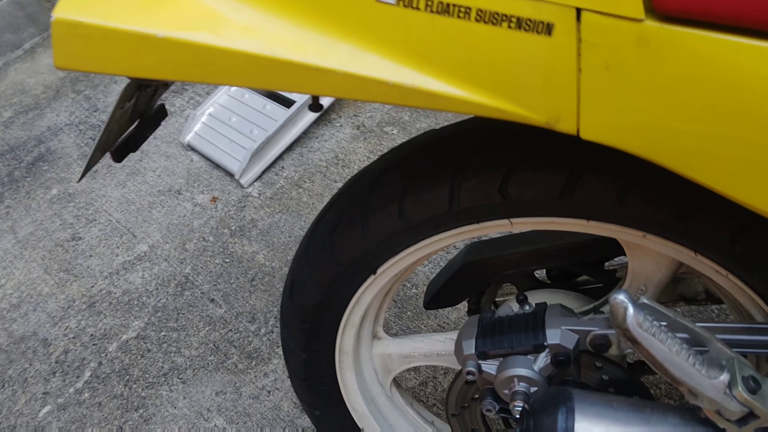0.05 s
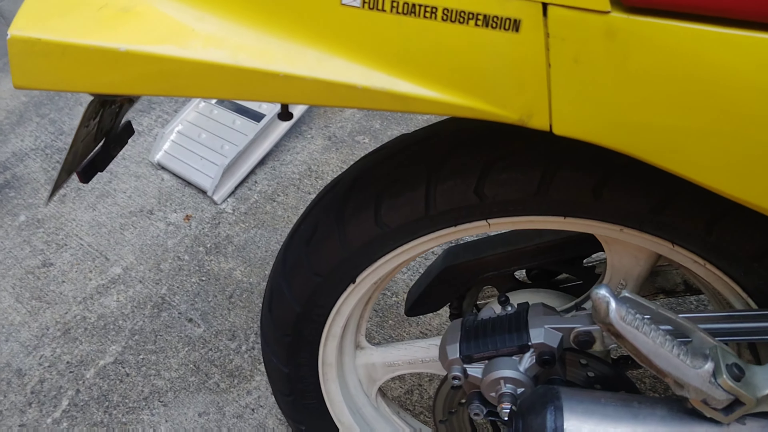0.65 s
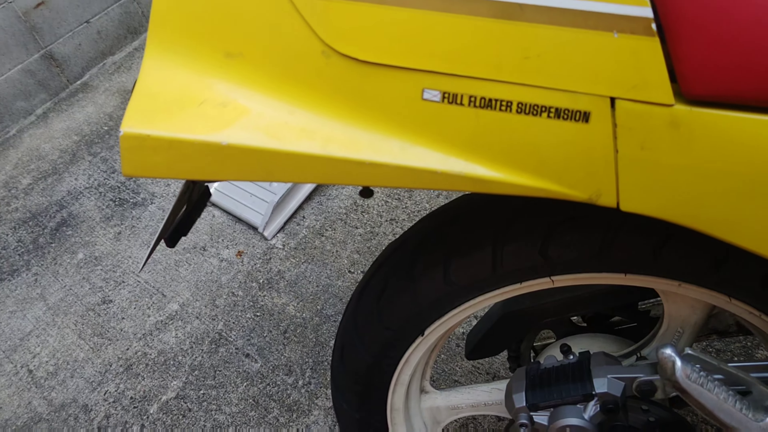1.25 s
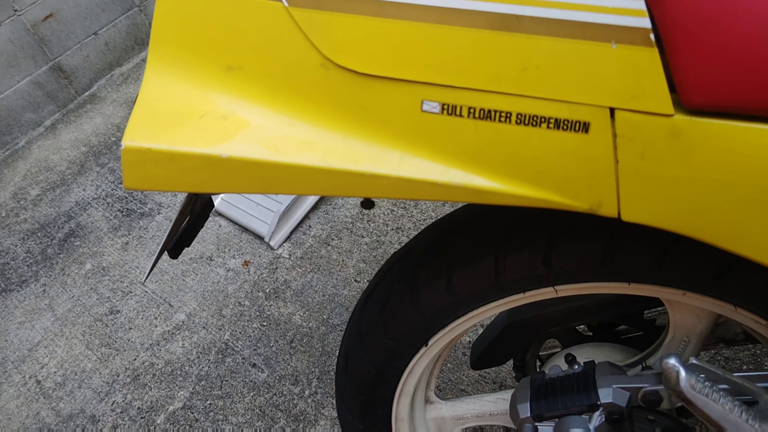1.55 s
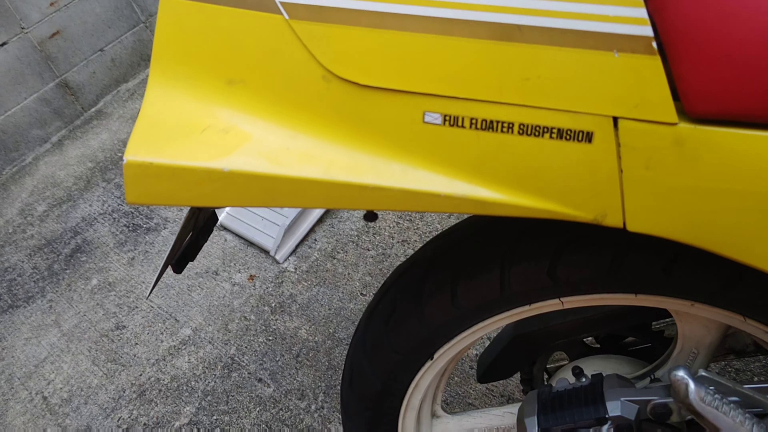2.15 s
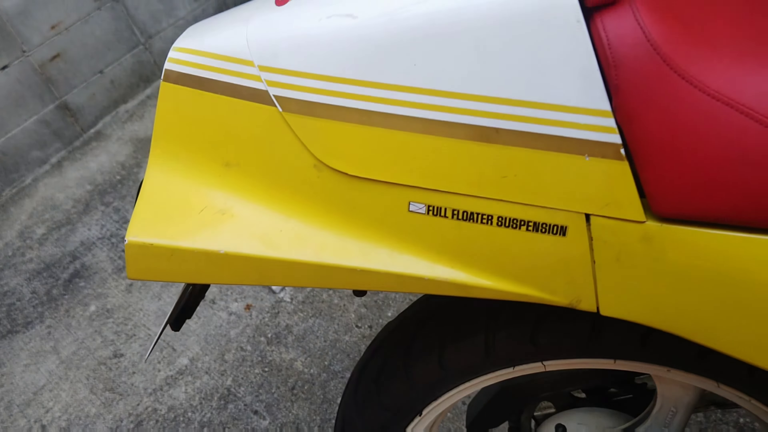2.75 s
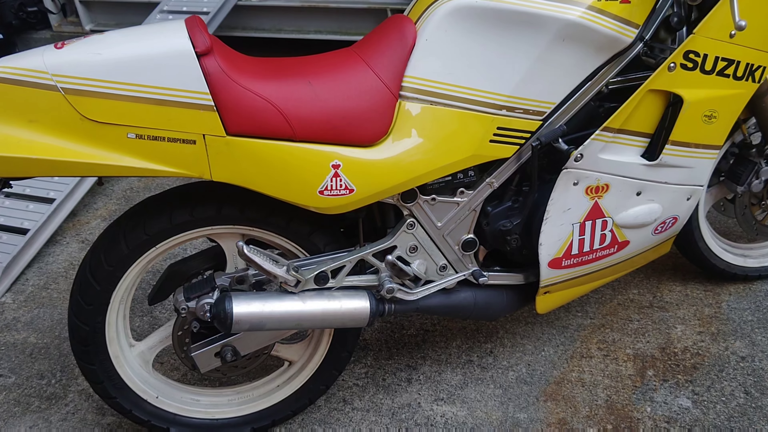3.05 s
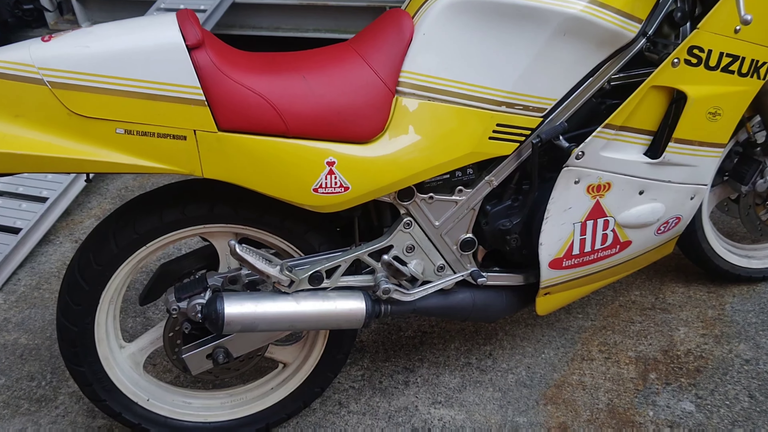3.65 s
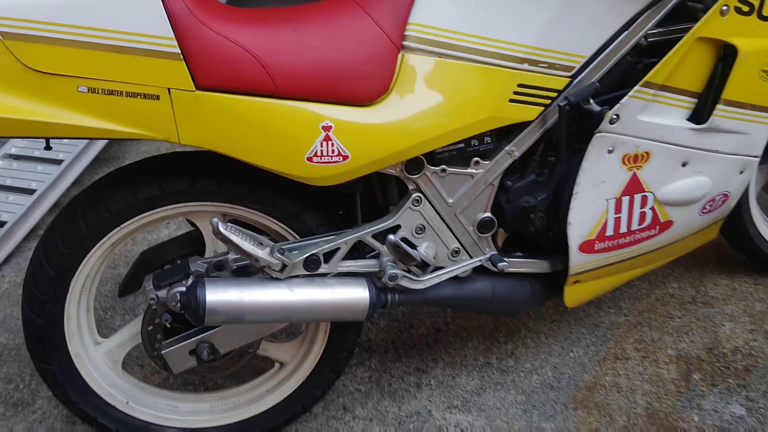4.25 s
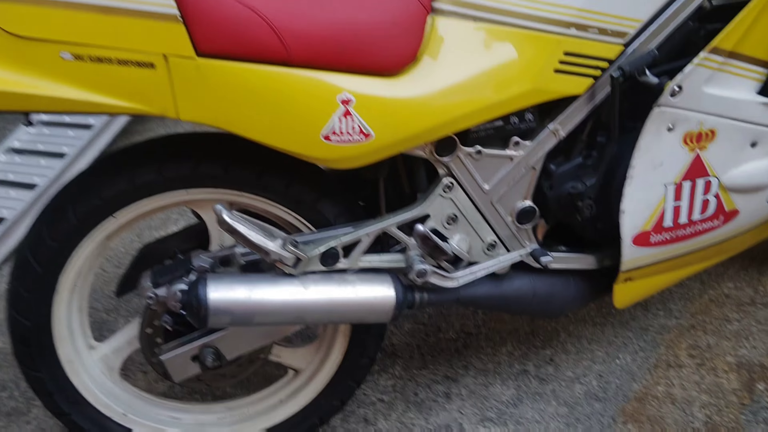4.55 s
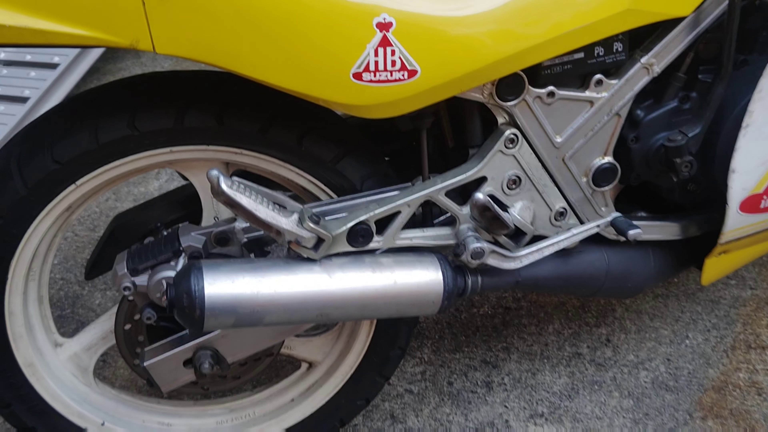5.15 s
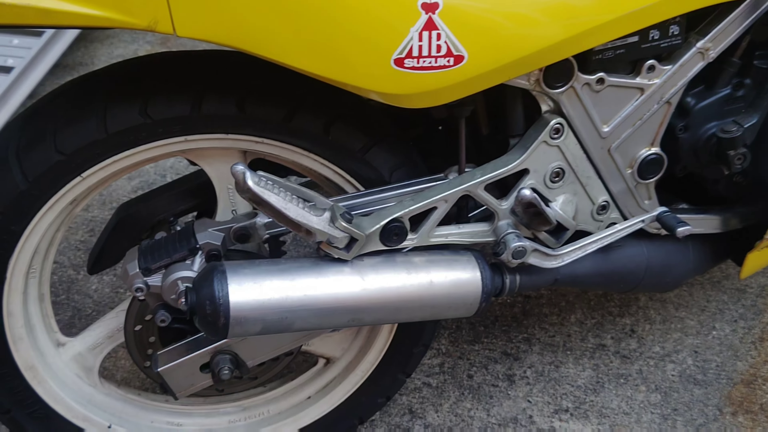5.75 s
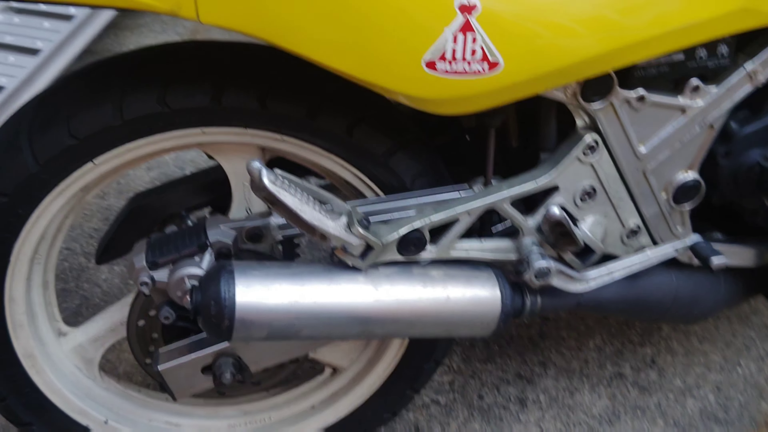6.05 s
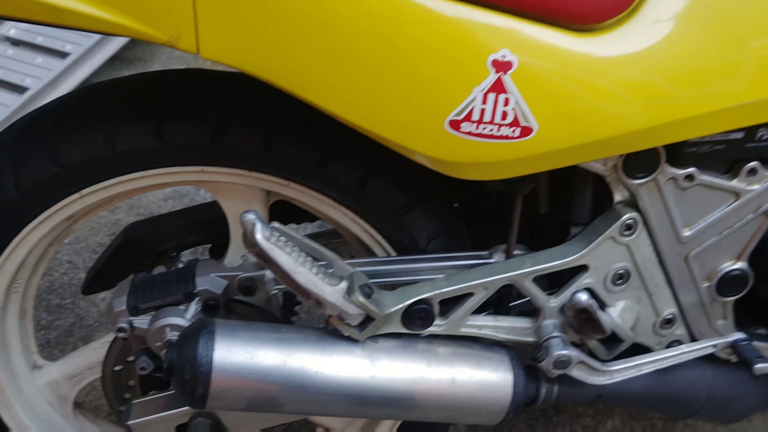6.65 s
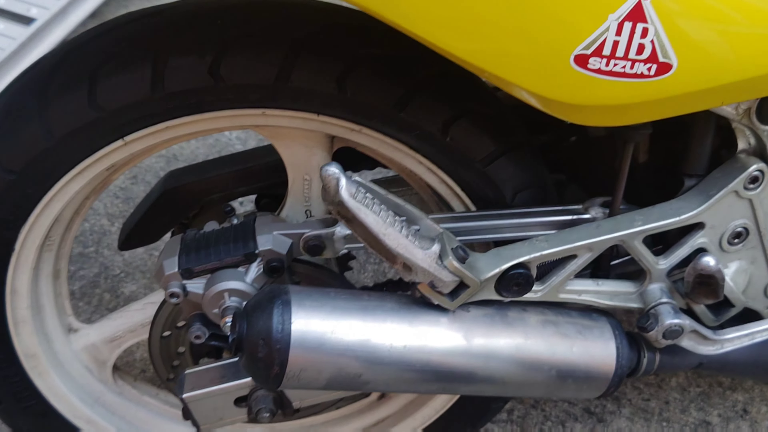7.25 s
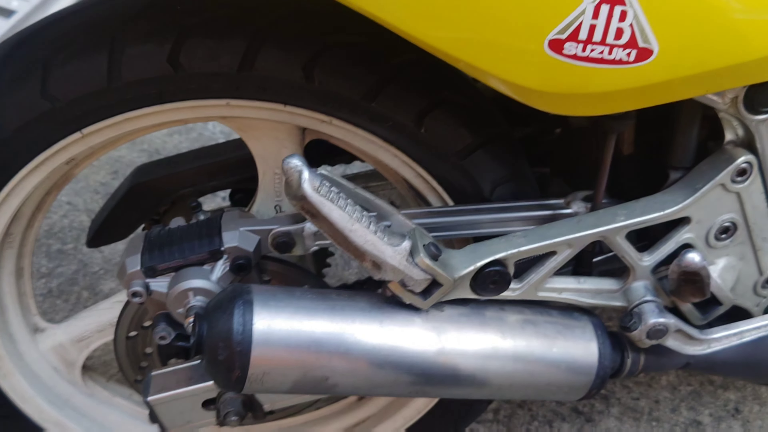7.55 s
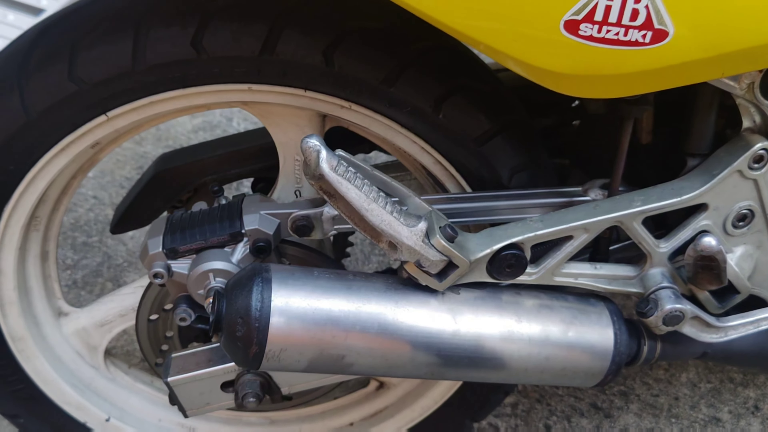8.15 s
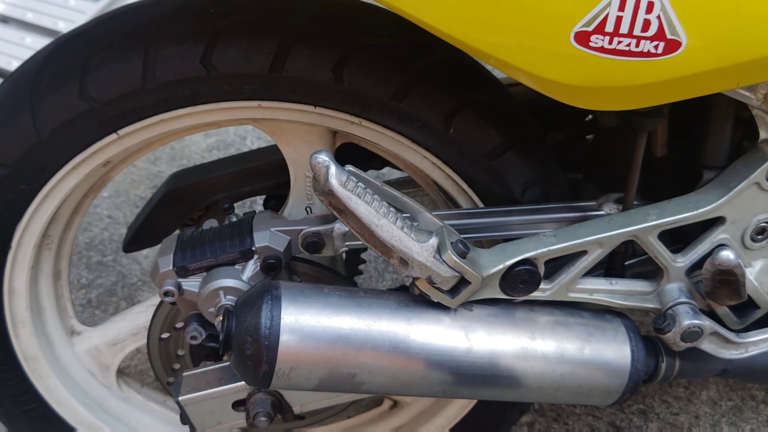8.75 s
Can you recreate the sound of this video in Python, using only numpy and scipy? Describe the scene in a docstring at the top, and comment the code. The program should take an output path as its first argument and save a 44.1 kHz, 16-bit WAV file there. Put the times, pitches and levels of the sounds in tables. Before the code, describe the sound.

A small two-stroke motorcycle winds down from high revs and stops with metal clacks, then idles unevenly with loud exhaust pops.

```python
"""A small two-stroke motorcycle stands on concrete, heard a step from its silencer.
First the revs fall from a blip of the throttle and catch briefly. The engine then runs down and stops
with a few metal clacks. After a short silence it idles unevenly, with loud pops among mild turns.
Each firing rings the exhaust chamber (a boom) and the tailpipe (a bark) and spits gas,
while the cylinder rattles. Three sharp clicks are heard, and toward the end the idle grows lumpier."""
import sys
import numpy as np
from scipy import signal
from scipy.fft import rfft, irfft
from scipy.io import wavfile
from scipy.ndimage import uniform_filter1d, minimum_filter1d, map_coordinates

SR = 44100
rng = np.random.default_rng(int(sys.argv[2]) if len(sys.argv) > 2 else 0)


def output_pcm(signal):
    """Save a mono or channel-first signal as 16-bit PCM at the path in sys.argv[1].

    Samples are clipped to [-1, 1] before scaling.
    """
    pcm = np.clip(np.atleast_2d(signal).T, -1, 1) * 32767
    wavfile.write(sys.argv[1], SR, np.round(pcm).astype(np.int16))


N = 392049
T = np.arange(N) / SR

# Falling crank speed: t/s, turns/Hz
CRANK_SPEED = [(0, 110.7), (.08, 107), (.188, 100.4), (.364, 94), (.51, 89.3), (.628, 79.2), (.742, 73.7),
               (.86, 66), (.936, 57.4), (1.026, 53.5), (1.165, 45), (1.282, 47), (1.43, 47.3), (1.5, 44.7),
               (1.594, 40), (1.7, 31), (1.75, 25)]
# Exhaust while running down: t/s, boom level/dB, bark level/dB
EXHAUST_LEVELS = [(0.0, -19, -21), (0.08, -10, -18), (0.27, -14.5, -21), (0.47, -9, -17), (0.55, -8, -22),
                  (0.63, 1.5, -16), (0.73, 0.5, -28), (0.78, -2, -18), (1.2, -2.5, -18), (1.32, -3, -23.5),
                  (1.41, -3.5, -14.5), (1.54, -4, -18.5), (1.59, -0.5, -29), (1.66, 0.5, -31),
                  (1.69, -6, -36), (1.74, -7, -25), (1.79, -5, -29), (1.83, -1, -34), (1.9, -10, -37.5),
                  (1.94, -4.5, -38), (1.99, -9, -31.5), (2.07, -9, -40.5), (2.12, -17, -42),
                  (2.22, -23.5, -49), (2.4, -27, -50)]
# Boost from a slightly open throttle: t/s, rasp level/dB, hiss level/dB
THROTTLE = [(0, 11.5, 5), (.27, 1, 4), (.32, 4, -0.5), (.38, 5, 7.5), (.5, 7, 4), (.64, 1, 2.5),
            (.9, 0.5, 0), (1.05, 0, 3.5), (1.15, 1, 1.5), (1.24, 0, 6.5), (1.34, -2.5, -1.5),
            (1.46, 0.5, 4.5), (1.6, -2.5, 0.5)]
# Moments of uneven burning: t/s, half length/s, extra level spread/dB
STUMBLES = [(0.253, 0.028, 13.2), (.41, 0.095, 4)]
# A slow engine sputters: turns/Hz, level spread/dB, timing spread/s
SPUTTER = [(42, 1.3, .0001), (55, .8, .00005), (70, 0, 0)]
# A slow engine's gas churns more: turns/Hz, noise strength in the boom, in the bark
BURBLE = [(20, .7, 3), (32, .15, 1.6), (46, .08, .3), (80, .03, .12)]
# Idle pops: t/s, then level/dB of bark, boom, spit, ping, next turn's boom and spit, later mild booms
POPS = [(3.086, -27, -14, -37, -52.0, -16, -46.0, -12), (3.151, -29, -18.5, -46, -59.0, -12, -40, -8),
        (3.225, -23, -7, -32.5, -52, -10, -39, -10), (3.298, -17, -11, -34, -52, -14, -56, -17.5),
        (3.37, -29, -7.5, -37, -57.5, -11.5, -43, -9), (3.45, -20.5, -7, -32, -52, -8.5, -41, -14.0),
        (3.499, -20, -6, -32.5, -56.0, -11.5, -50, -11),
        (3.578, -24.5, -2.5, -29.5, -38, -8.5, -38.5, -14.5),
        (3.658, -17, -4.5, -26.5, -38, -5.5, -42, -1.5), (3.735, -22.0, -2, -31, -37, -7, -44, -8),
        (3.813, -19, -4, -44, -50.0, -5.5, -51, -16), (3.866, -25, -2.5, -37, -50, -2.5, -53, 1.5),
        (3.942, -28, -0.5, -29, -35, -7, -29, -4), (4.049, -23.5, -4.5, -38, -51.0, -3.5, -45, 2),
        (4.124, -18, 1, -26.5, -36, -6.5, -47, -8), (4.206, -33, -10, -46, -52.0, -13, -47, -6.5),
        (4.285, -29, -9, -35, -43, -7, -45, -6.5), (4.352, -27, -1.5, -37, -52.0, -3, -36.5, -1),
        (4.432, -21, -6, -32, -38, -7.5, -46.5, -14.0), (4.483, -20, -1, -29.5, -32, -4, -49, -4.0),
        (4.562, -21, -2, -29, -31, -10, -44, -6), (4.64, -19.0, -0.5, -29, -35, -4.0, -45, -14.0),
        (4.692, -26, -1.5, -32, -53.5, -0.5, -37, -3.5), (4.794, -25, -2.0, -31.5, -36, -6, -49, -0.5),
        (4.875, -29.0, -2.0, -28.5, -55, -0.5, -34.0, -2), (4.998, -32, 0, -34, -49, -2.5, -35, -6.5),
        (5.15, -22, 1, -32, -44.0, -1.5, -40, -3), (5.302, -18.5, 0.5, -29, -34, -6, -38, 3.5),
        (5.404, -20, 1, -30, -34, -1.5, -46.0, -8), (5.479, -30, 0.5, -31, -42.5, -17, -46, -2),
        (5.555, -15, 0.5, -29, -31, -2, -48.0, 0.5), (5.682, -18, -0.5, -25, -52, -3.0, -50, -4),
        (5.81, -17.0, 0.5, -39.5, -34, -6, -32, -20), (5.863, -16.0, 0, -33, -32, -0.5, -43.0, -14.0),
        (5.913, -14.5, 1, -30, -32, -6, -51, -2.5), (6.047, -19, -4.5, -30, -43.5, -2, -38.5, -2),
        (6.118, -15, 0.5, -32, -30, -4.5, -42, -0.5), (6.206, -17, 1, -25.5, -50.5, -1, -44, -6.5),
        (6.277, -17.5, 1, -34, -51.0, -21, -47.5, -14.0), (6.333, -16, -1, -26, -36, -2, -27.5, -10),
        (6.489, -19, 0, -28.5, -42, -5, -31, 2.5), (6.597, -27, -8.5, -35, -52.5, -4, -34.0, -6),
        (6.675, -39, -9, -45, -46.0, -1, -35, 2), (6.751, -14.5, -0.5, -31.5, -50.0, -14, -54, -1),
        (6.886, -15, -3.0, -26, -49, 1.5, -32.5, -1), (6.958, -21, -2.5, -37, -49, -7.0, -53, -14.0),
        (7.01, -22, -2.5, -29.5, -33, -1, -29.5, -17.5), (7.111, -21, -7, -39, -51, -10.5, -51, -14.0),
        (7.164, -16, 0, -28.5, -28, 1, -28.5, -15.5), (7.266, -21, -6.5, -47, -53.0, -9, -59, -14.0),
        (7.319, -12.5, -0.5, -27, -24, 1.5, -30.5, -9.5), (7.472, -11, -1, -24.5, -18, 1, -37, -6),
        (7.626, -15, 2, -33, -42.5, -10.5, -51, -14.0), (7.679, -14.0, -0.5, -25.5, -26, 0.5, -40, -5),
        (7.808, -25, -0.5, -36.0, -55.0, 1, -33, -11.5), (7.887, -12.0, 1, -28, -29.5, -10, -55, -9.0),
        (7.967, -27, -0.5, -32, -52.5, -8.5, -43.0, -14.0), (8.022, -18, 0, -31, -53.0, -8.0, -29.0, -14.0),
        (8.046, -11, 3, -28, -38, -13.5, -50, -14.0), (8.098, -16, 0, -33.5, -34.0, -15, -47.0, 1.5),
        (8.18, -14, -0.5, -23.5, -47.0, -14, -35.0, 2), (8.256, -15, 0.5, -27, -39, -22, -55, -14.0),
        (8.31, -17, -1.5, -38, -35, 0.0, -30, -4), (8.464, -17, 0.5, -26.5, -31.0, -0.5, -29.5, -0.5),
        (8.621, -13, 1, -26, -36.0, -7.5, -58, -4), (8.699, -24, 0.5, -27, -49.5, -3, -47, -6),
        (8.771, -18, -3.5, -32.0, -31, -13, -47, -14.0), (8.826, -20, -2, -33.5, -39.5, 0.5, -34, -14.0),
        (8.879, -15, -3, -32, -30.5, -8.0, -33.5, -14.0)]
# How fully the idle misfires: t/s, lumpiness (0-1)
LUMPINESS = [(3.4, 0), (5, 0.1), (7.2, 1)]
# Short bright clicks: t/s, level/dB, time to fade by 60 dB/s, top edge level/dB
CLICKS = [(1.673, -17, .04, -6), (1.775, -14, 0.091, 8), (1.858, -12.5, 0.061, 11), (1.881, -16, 0.061, -4),
          (1.909, -12, 0.06, 12), (1.969, -10, 0.056, -2), (2.007, -18, 0.047, -9), (2.048, -12, 0.086, 10),
          (2.076, -24, 0.041, -10), (2.138, -21, 0.079, -10), (2.231, -47, 0.058, -16),
          (2.32, -20.5, 0.062, -15), (4.174, -9, 0.011, 17), (6.577, -12, 0.012, 26), (6.584, -3, 0.016, 8)]
# The next three: t/s, level/dB
KNOCKS = [(2.071, -18.5), (6.159, -24.5)]  # blows on the pipe wall
WHISTLE_LEVEL = [(3, -40), (3.3, -32), (4, -31), (4.3, -41), (5.4, -38), (8.9, -38)]  # gas in the tailpipe
FIN_LEVEL = [(3, -48), (3.3, -35), (3.6, -31), (3.85, -34), (4.2, -43), (5.2, -45.5), (7.3, -44)]  # ringing cooling fins

# The notes at which each part rings: f/Hz, width/Hz, level/dB
CHAMBER_RUN_DOWN = [(146, 46, 0)]
CHAMBER_IDLE = [(147.5, 18.5, -3)]
TAILPIPE_RUN_DOWN = [(408, 52, 0), (456, 52, -.5)]
TAILPIPE_IDLE = [(387.3, 27, 6.5), (410, 15, -6.5), (455.7, 19.5, -4.5), (485, 43, -7)]
HEADER, MOUTH = [(146, 50, 6)], [(400, 145, 0)]  # pipe from the cylinder, silencer opening
PIPE_WALL = [(790, 40, -4), (870, 50, 0), (1010, 40, -3), (1285, 60, -1), (1720, 80, -2), (1840, 80, 0),
             (2300, 60, -4), (2650, 60, -3), (3020, 70, -1)]
WALL_SINGING = [(795, 40, -2), (868, 45, 0), (1010, 25, -6), (1266, 55, 0), (1700, 70, 0), (1815, 80, 4)]  # the wall at high revs
SILENCER_CAN = [(1278, 28, 0), (1650, 45, -6)]
COOLING_FINS = [(855, 13, 2), (1861, 21, -2.5), (2977, 58, -5.5)]
CLICK_PING = [(4420, 110, 0), (4950, 130, -1), (7250, 180, -3)]

# The tone of each noise, from bass to treble: f/Hz, level/dB
RASP_TONE = [(330, -42), (560, -15.5), (696, 1), (874, 4), (945, -2), (1120, -2), (1260, -1), (1370, -3),
             (1830, 3), (1980, -0.5), (2440, -21.5), (2990, 0.5), (3290, -23.5), (4500, -67), (5850, -57),
             (9900, -120)]
HISS_TONE = [(2060, 2), (3500, 1), (3710, 1), (4880, 3.5), (5840, -2.5), (6380, -0.5), (7670, 0),
             (9230, -4), (10800, -10), (13700, -6), (14500, -28)]
SPIT_TONE = [(400, -18), (700, 11.5), (1400, 8), (2500, 10), (4000, 4), (6000, 2), (8500, -0.5),
             (10500, -5), (13000, -1), (14500, -5)]
RATTLE_TONE = [(280, -11), (480, 2), (612, -3), (832, 4.5), (905, -6), (1020, 5), (1170, -4.5), (1280, 2),
               (1380, -1), (1690, 3), (1980, -3), (2920, -1), (3360, -8), (4760, -13.5), (6000, -55),
               (7800, -48.5), (13200, -120)]
IDLE_HISS_TONE = [(2350, 6.5), (4000, -22), (4460, 4), (4910, 3.5), (5860, -5.5), (8460, -7), (9890, -16),
                  (13700, -11), (14500, -12)]
CLICK_TONE = [(1000, -11), (2200, 4.5), (3200, -4.5), (4300, 7.5), (6000, 4), (7800, 6.5), (10000, -4),
              (14500, -38)]
BACKGROUND_TONE = [(18, -8.5), (30, -14), (43, -5.5), (86, -20.5), (168, -15.5), (304, -22.5), (383, -22.5),
                   (674, -30), (1160, -33.5), (1740, -31), (2310, -37), (2840, -35.5), (3770, -39.5),
                   (11100, -50), (14000, -53)]

# The microphone moves along the bike: t/s, nearness to the silencer (0-1)
NEARNESS = [(3.6, 0.52), (5.1, 0.38), (7.3, 0.67)]
# Later arrival on its left side: t/s, delay/ms
LEFT_DELAY = [(2.85, .42), (2.97, 0), (5.7, .1), (7.3, .26), (8.9, .32)]
# Left side compared with right: f/Hz, level/dB
BALANCE = [(100, 0.1), (200, 0.3), (370, 1.6), (1200, 1.8), (2300, 0.2), (4300, -1.8), (8000, -1.3),
           (14000, 1.7)]
# How alike the two sides are: f/Hz, likeness (0-1)
LIKENESS = [(150, 0.83), (300, 0.8), (600, 1), (1200, 0.074), (2500, 0.29), (5000, 0.041), (14000, 0.2)]

COAST_S, SPREAD_DB = 0.39, 0.55  # how slowly the crank coasts down; level spread between turns
PUMP_DB, FULL_PUMP_SLOWING = -15, 68  # pumping is strongest once the crank loses 68 Hz a second
# Level/dB at 100 turns a second, change/dB each time the speed doubles
RASP_LAW, HISS_LAW, HUM_LAW, SING_LAW = (-20, 3.57), (-20, 6.15), (-26.5, 9.2), (-23, 12)
IDLE_HZ, JITTER_S = 38.62, .0005  # idle turns a second; mild turns fire a little early or late
MILD_DB, MILD_SPREAD_DB = (-39, -3, -60, -50), (3, 1.6, 3, 3)  # bark, boom, spit, ping
SECOND_BARK_DB, MISFIRE_DB, RECOVERY_DB = -15.5, -26, -6.5  # the turns that follow a pop
CRACK_DB, PING_DB = -15.5, 3
# Level/dB beside the bike, level/dB at the silencer
THROB_DB, OVERTONE_DB, RUMBLE_DB = (-36.5, -20), (-40, -16), (-44.5, -15)
TAILPIPE_DB, SWIRL_DB = (-15, -23.5), (-30, -36)
RATTLE_DB, IDLE_HISS_DB = (-28.5, -37), (-34.5, -46.5)
SILENCE_S, SWELL_S, BASS_IN_S = (2.853, 2.975), (2.88, 3.75), (3.52, 3.72)  # start, end
CEILING_DB, LIMITER_S, TOP_HZ = -.1, .008, 14500


def idle():
    """Each turn of the crank rings the exhaust and spits gas, as hard as it burns."""
    phase, times, (bark_db, boom_db, spit_db, ping_db) = idle_turns()
    boom = idle_boom(times, boom_db)
    bark, crack = idle_bark(times, bark_db)
    swirl = idle_gain(SWIRL_DB) * steady(band(noise(), 226, 298))  # chamber gas fills the gaps
    echo = undb(-13) * echoes(boom, t60=0.046).mean(axis=0)
    pipe = boom + bark + throb(phase, times, boom_db) + swirl + echo
    bright = cylinder_rattle(times) + gas_spit(times, spit_db, ping_db) + crack
    return (pipe + delay_left(bright)) * (T > SILENCE_S[1])


def idle_turns():
    """Uneven burning: gives the running count of turns, their times and their four levels."""
    pops = np.array(POPS)
    marks = np.r_[SILENCE_S[1], pops[:, 0]]
    gaps = np.maximum(1, np.round(np.diff(marks) * IDLE_HZ))  # pops fall on whole turns
    turns = np.cumsum(np.r_[0, gaps]).astype(int)
    phase = np.interp(T, marks, turns) + IDLE_HZ * np.maximum(T - marks[-1], 0)
    times = np.interp(np.arange(phase[-1]), phase, T)
    db = MILD_DB + luck(len(times), size=4).T * MILD_SPREAD_DB
    db[:turns[1], 1] += pops[0, -1]
    db[:turns[1]] += np.linspace(-7, 0, turns[1])[:, None]  # build up to the first pop
    ends = np.r_[turns[2:], len(db)]
    for turn, end, pop in zip(turns[1:], ends, pops):
        s, bark, boom, spit, ping, next_boom, next_spit, mild_boom = pop
        run = db[turn:end]
        run[:1] = bark, boom, spit, ping
        run[1:2, :3] = bark + SECOND_BARK_DB, next_boom, next_spit
        run[2:, 1] += mild_boom
        if len(run) > 3:  # in a long gap the third turn misfires and later booms are weaker
            lumpy = np.interp(s, *np.transpose(LUMPINESS))
            run[2] += lumpy * MISFIRE_DB
            run[3:, 1] += lumpy * RECOVERY_DB / len(run[3:])
    is_mild = ~np.isin(np.arange(len(times)), np.r_[turns, turns + 1])
    return phase, times + is_mild * JITTER_S * luck(len(times), size=1)[0], db.T


def idle_boom(times, boom_db):
    """Each firing rings the header pipe and then the chamber; the deep bass fades in late."""
    blows = pulses(times, undb(boom_db)) * strike_size(CHAMBER_IDLE)
    boom = band(ring(ring(blows, HEADER), CHAMBER_IDLE), 60, 205)
    thin = band(boom, 115, 600)
    return thin + (boom - thin) * np.interp(T, BASS_IN_S, [0, 1])


def idle_bark(times, bark_db):
    """A pop leaves the silencer as a bark and a hard crack; the tailpipe rings and whistles."""
    blows = pulses(times, undb(bark_db))
    pop = np.e * band(ring(ring(blows, MOUTH), MOUTH), 256, 730) * strike_size(MOUTH)
    bursts = noise() * uniform_filter1d(fade(blows, 0.01), size=90)
    crack = 4 * undb(CRACK_DB) * band(bursts, 520, 1800)
    ringing = band(ring(blows, TAILPIPE_IDLE), 326, 533) * strike_size(TAILPIPE_IDLE)
    whistle = steady(band(ring(noise(), TAILPIPE_IDLE + MOUTH), 340, 540))
    tailpipe = ringing * idle_gain(TAILPIPE_DB) + whistle * undb(curves(WHISTLE_LEVEL)[0])
    return pop + 0.7 * tailpipe + 0.55 * echoes(tailpipe, t60=0.07), crack


def run_down():
    """One exhaust pulse a turn: the pitch falls while the pipe's own notes stay put."""
    hz = curves(CRANK_SPEED)[0] * np.exp(-np.maximum(T - CRANK_SPEED[-1][0], 0) / COAST_S)
    phase = np.cumsum(hz) / SR
    turns = np.arange(1, phase[int(EXHAUST_LEVELS[-1][0] * SR)])
    times = np.interp(turns, phase, T)
    size_luck, gas_luck, time_luck = luck(len(times), size=3)
    sputter_db, sputter_s = curves(SPUTTER, at=np.interp(times, T, hz))
    times = times + sputter_s * time_luck
    stumble_db = sum(db * np.exp(-((times - s) / half) ** 2) for s, half, db in STUMBLES)
    sizes = undb((SPREAD_DB + sputter_db + stumble_db) * size_luck)
    blows = pulses(times, sizes)
    gulps = pulses(np.interp(turns + .5, phase, T), sizes)  # the intake, half a turn later
    late_blows = pulses(times + 0.00611, sizes)  # after crossing the chamber
    boom = run_down_boom(hz, phase, blows, gulps, late_blows)
    bark = run_down_bark(hz, late_blows)
    gas = rasp_and_hiss(hz, blows, spurts=pulses(times, sizes * undb(7 * gas_luck)))
    hum = np.sin(2 * np.pi * (phase - .35)) * speed_gain(hz, HUM_LAW)
    wall = band(ring(pulses(times, 1), WALL_SINGING), 774, 1880, order=4)
    sing = steady(wall) * speed_gain(hz, SING_LAW)
    echo = .26 * echoes(boom, t60=.22) + .45 * echoes(bark, t60=.1)
    engine = boom + bark + hum + sing + piston_pump(hz, phase) + delay_left(gas)
    return (engine + echo) * np.interp(T, [2.1, 2.5], [1, 0])


def run_down_boom(hz, phase, blows, gulps, late_blows):
    """Gas flow rings the chamber, which swallows most of the once-a-turn swing."""
    swing = 1.3 * hz / SR * np.cos(2 * np.pi * phase)
    flow = blows + np.interp(hz, [22, 42], [.8, .15]) * gulps - swing
    ringing = ring(ring(flow, CHAMBER_RUN_DOWN), CHAMBER_RUN_DOWN)
    boom = steady(band(ringing, 50, 300), span=.07)
    burble = steady(band(rng.standard_normal(N), 120, 160), span=.04)
    boom = steady(boom + curves(BURBLE, at=hz)[0] * burble, span=.07)
    # a little flow slips past without ringing the chamber
    low_leak = undb(-15) * steady(band(flow, 95, 98))
    high_leak = undb(-10) * steady(band(echoes(late_blows, t60=0.043), 215, 313))
    boom = boom + np.interp(hz, [24, 47, 58], [.12, .6, 1]) * (low_leak + high_leak)
    # the long pipe delays the deep part, rounding each spike
    boom = steady(boom - 2 * ring(boom, [(110, 70, 0)]), span=.06)
    return boom * undb(curves(EXHAUST_LEVELS)[0] - 9)


def run_down_bark(hz, blows):
    """Each pulse rings the tailpipe and drags churning gas along."""
    ringing = ring(ring(blows, TAILPIPE_RUN_DOWN), TAILPIPE_RUN_DOWN)
    bark = steady(band(ringing, 180, 595), span=0.24)
    burble = steady(band(ring(noise(), TAILPIPE_RUN_DOWN), 220, 650))
    bark = steady(bark + curves(BURBLE, at=hz)[1] * burble, span=.08)
    return bark * undb(curves(EXHAUST_LEVELS)[1] + 1.5)


def rasp_and_hiss(hz, blows, spurts):
    """Gas tears out after each pulse, and the pipe wall buzzes with it."""
    flutter = steady(fade(spurts, 0.016)) + 3.3
    wall = ring(blows, PIPE_WALL)
    buzz = .8 * steady(band(wall, 680, 3400)) + .5 * steady(band(wall, 600, 1400))
    buzz = buzz + .6 * steady(colour(echoes(blows, t60=.04), RASP_TONE))
    rush = steady(colour(noise() * flutter, RASP_TONE))
    buzz_share = np.interp(hz, [45, 90], [.15, .82])
    rasp = steady(np.sqrt(buzz_share) * steady(buzz) + np.sqrt(1 - buzz_share) * rush)
    hiss = colour(noise() * flutter, HISS_TONE) / np.std(flutter)
    hiss = steady(hiss + 0.72 * steady(colour(echoes(blows, t60=0.056), HISS_TONE)))
    rasp_boost, hiss_boost = undb(curves(THROTTLE))
    return rasp * rasp_boost * speed_gain(hz, RASP_LAW) + hiss * hiss_boost * speed_gain(hz, HISS_LAW)


def piston_pump(hz, phase):
    """While the crank slows, the piston pumps air twice a turn."""
    slowing = -uniform_filter1d(np.gradient(hz), size=2000) * SR
    strength = np.clip(slowing / FULL_PUMP_SLOWING, 0, 1)
    return band(-np.cos(4 * np.pi * phase) * strength, 62, 122) * undb(PUMP_DB)


def throb(phase, times, boom_db):
    """A deep once-a-turn throb swells with the idle's firings, amid the rumble of churning gas."""
    surge_db = uniform_filter1d(boom_db, size=4) - np.median(boom_db)
    uneven_db = surge_db + 0.94 * luck(len(times), size=1)[0]
    swing = np.sin(2 * np.pi * phase) * undb(np.interp(T, times, uneven_db)) * idle_gain(THROB_DB)
    overtone = -np.sin(6 * np.pi * phase) * undb(np.interp(T, times, surge_db / 2))
    rumble = steady(band(noise(), 62, 132)) * idle_gain(RUMBLE_DB)
    return (swing + overtone * idle_gain(OVERTONE_DB) + rumble) * np.interp(T, BASS_IN_S, [0, 1])


def gas_spit(times, spit_db, ping_db):
    """Each idle firing spits crackling gas and pings the silencer can."""
    spurts = uniform_filter1d(fade(pulses(times, undb(spit_db)), 0.02), size=150)
    crackle = undb(3 * np.repeat(rng.standard_normal(N // 30 + 1), 30)[:N])
    jet = noise() * steady(crackle) * spurts
    taps = pulses(times + 0.00516, undb(ping_db + PING_DB)) * strike_size(SILENCER_CAN)
    can_rush = undb(20) * band(ring(jet, SILENCER_CAN), 1030, 3100)
    return colour(jet, SPIT_TONE) + can_rush + ring(taps, SILENCER_CAN)


def cylinder_rattle(times):
    """The piston slaps at both ends of its stroke: a rattle, a hiss and ringing fins."""
    first, second = luck(len(times), size=2)
    slaps = pulses(times, undb(5 * first)) + pulses(times + .5 / IDLE_HZ, undb(-5.5 + 7 * second))
    shake = steady(fade(slaps, 0.029)) + 0.36
    rattle = steady(colour(noise() * shake, RATTLE_TONE)) * idle_gain(RATTLE_DB)
    fins = steady(band(ring(noise() * shake, COOLING_FINS), 760, 3400)) * undb(curves(FIN_LEVEL)[0])
    hiss = steady(colour(noise() * shake, IDLE_HISS_TONE)) * idle_gain(IDLE_HISS_DB)
    return rattle + fins + hiss


def clicks():
    """Short bright clicks: metal clacks as the engine stops, and three sharp clicks during the idle."""
    body, edge = np.zeros(N), np.zeros(N)
    for s, db, t60, edge_db in CLICKS:
        start = int(s * SR)
        burst = undb(db - 9) * 1000 ** (-T[:SR // 4] / t60)
        body[start:start + len(burst)] += burst
        edge[start:start + len(burst)] += burst * undb(edge_db)
    ping = undb(8) * band(ring(noise() * body, CLICK_PING), 3900, 8000)
    click = undb(-2) * colour(noise() * body, CLICK_TONE)
    return ping + click + undb(-11) * band(noise() * edge, 11100, 13200)


def knocks():
    """Dull knocks ring the pipe wall."""
    times, db = np.transpose(KNOCKS)
    bursts = noise() * fade(pulses(times, undb(db)), 0.013)
    return undb(11.5) * band(ring(bursts, PIPE_WALL), 600, 3600)


def background():
    """Faint steady low rumble and hiss under everything."""
    return colour(noise(), BACKGROUND_TONE) * undb(-44)


def undb(db):
    """Turn decibels into a multiplier."""
    return 10 ** (np.asarray(db) / 20)


def curves(table, at=T):
    """Smoothly look up a table by its first column, normally at every moment."""
    keys, *columns = np.transpose(table)
    return [np.interp(at, keys, column) for column in columns]


def speed_gain(hz, law):
    """A faster crank is louder."""
    db, slope = law
    return undb(db + slope * np.log2(hz / 100))


def idle_gain(levels):
    """Fade an idle layer in and set its level by where the microphone is."""
    beside_db, close_db = levels
    near, = curves(NEARNESS)
    return np.interp(T, SWELL_S, [0, 1]) * undb(beside_db + (close_db - beside_db) * near)


def luck(count, size):
    """Give size rows of limited random values, one value a turn."""
    return np.clip(rng.standard_normal((400, size))[:count], -1.5, 1.5).T


def across(points, size):
    """Look up a table at every frequency of a sound size samples long."""
    hz, value = np.transpose(points)
    return np.interp(np.log(np.arange(size // 2 + 1) * SR / size + 1), np.log(hz), value)


def colour(x, tone):
    """Shape a sound by a tone table, cutting steeply past its ends; white noise keeps its power."""
    size = x.shape[-1]
    hz = np.arange(size // 2 + 1) * SR / size + 1
    ends = np.minimum(1, np.minimum(hz / tone[0][0], tone[-1][0] / hz)) ** 4
    gain = undb(across(tone, size)) * ends
    return irfft(rfft(x) * gain / np.sqrt(np.mean(gain ** 2)), size)


def noise(size=N):
    """Left and right white noise: alike in the bass, mostly unrelated in the treble."""
    like = np.clip(across(LIKENESS, size), 0, 1)
    mid, side = rfft(rng.standard_normal((2, size)))
    mid, side = mid * np.sqrt((1 + like) / 2), side * np.sqrt((1 - like) / 2)
    return irfft(np.array([mid + side, mid - side]), size)


def ring(x, notes):
    """Let a sound ring a part at each of its notes."""
    return sum(undb(db) * signal.lfilter(*signal.iirpeak(hz, hz / width, fs=SR), x + 1e-18)
               for hz, width, db in notes)


def strike_size(notes):
    """The click size that rings a part's first note up to its listed level."""
    return SR / (2 * np.pi * notes[0][1])


def band(x, low_hz, high_hz, order=2):
    """Keep what lies between two frequencies."""
    return signal.sosfilt(signal.butter(order, [low_hz, high_hz], "band", fs=SR, output="sos"), x + 1e-18)


def steady(x, span=0.68):
    """Hold the average strength over span seconds at 1."""
    power = np.mean(np.atleast_2d(x) ** 2, axis=0)
    size = int(span * SR)
    average = np.abs(uniform_filter1d(uniform_filter1d(power, size), size))
    return x / np.sqrt(average + 1e-6 * power.mean())


def pulses(times, sizes):
    """One click of the given size at each time."""
    return np.bincount(np.clip(times * SR, 0, N - 1).astype(int), sizes * np.ones(len(times)), N)


def fade(x, seconds):
    """Each click becomes a jump that dies away."""
    return signal.lfilter([1], [1, -np.exp(-1 / (seconds * SR))], x + 1e-18)


def echoes(x, t60):
    """Many short bounces off panels, wheel and concrete, fading by 60 dB in t60 seconds."""
    t = np.arange(SR // 4) / SR
    paths = noise(len(t)) * 1000 ** (-t / t60)
    return signal.fftconvolve(np.atleast_2d(x), paths / np.sqrt(np.sum(paths ** 2) / 2), axes=1)[:, :N]


def delay_left(x):
    """High sounds reach the left side later than the right."""
    delay_ms, = curves(LEFT_DELAY)
    left, right = x * np.ones((2, 1))
    return np.array([map_coordinates(left, [(T - delay_ms / 1000) * SR], order=3), right])


def scene():
    """Engine, clicks and background together, with a slightly different tone on each side."""
    sound = run_down() + idle() + clicks() + knocks() + background()
    balance_db = np.array([[.5], [-.5]]) * across(BALANCE, N)
    return irfft(rfft(sound) * undb(balance_db), N)


def record(dry):
    """A limiter turns loud peaks down, the sound cuts out briefly, and the highest treble is removed."""
    size = int(LIMITER_S * SR)
    peak = -minimum_filter1d(-np.abs(dry).max(axis=0), size)
    gain = uniform_filter1d((1 + (peak / undb(CEILING_DB)) ** 8) ** (-1 / 8), size)
    sound_on = uniform_filter1d(1. * ((T < SILENCE_S[0]) | (T > SILENCE_S[1])), size=200)
    return signal.sosfilt(signal.ellip(10, .2, 80, TOP_HZ, fs=SR, output="sos"), dry * gain * sound_on)


dry = scene()
out = record(dry)
output_pcm(out)
```